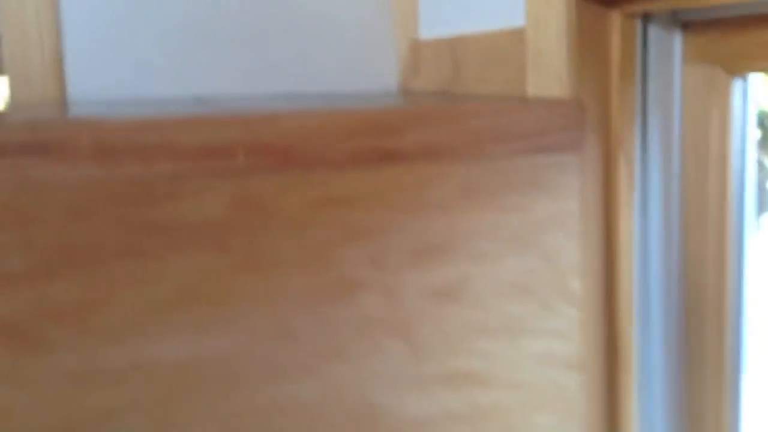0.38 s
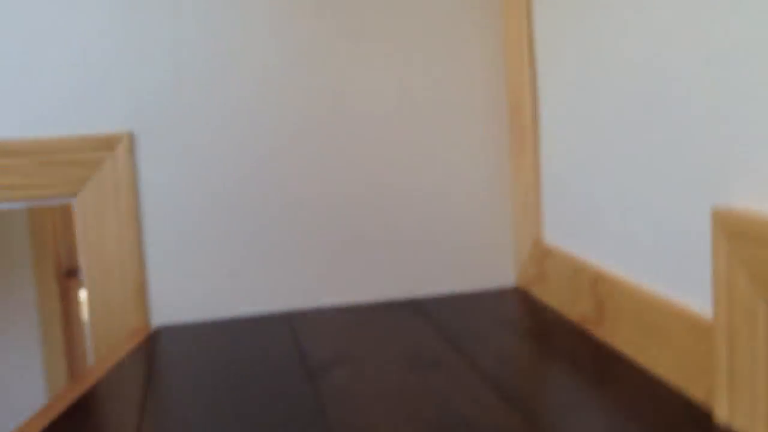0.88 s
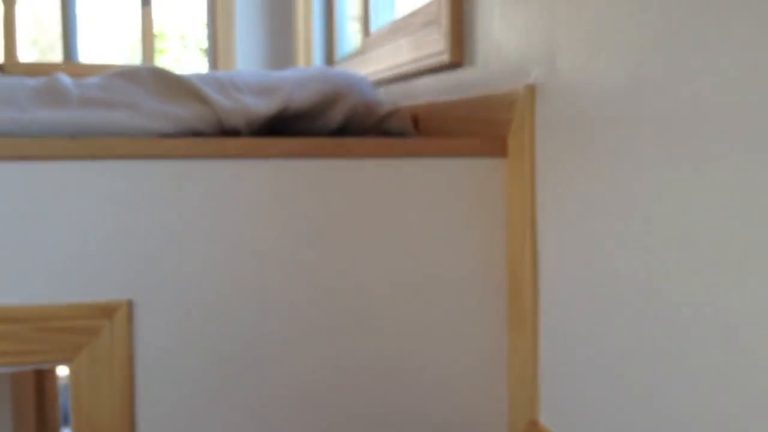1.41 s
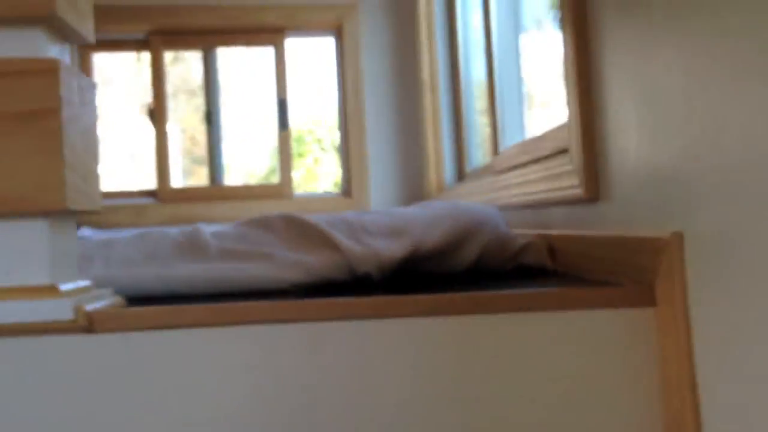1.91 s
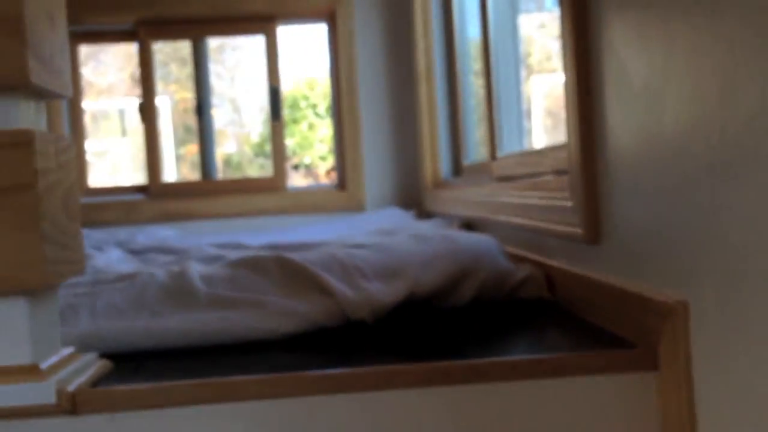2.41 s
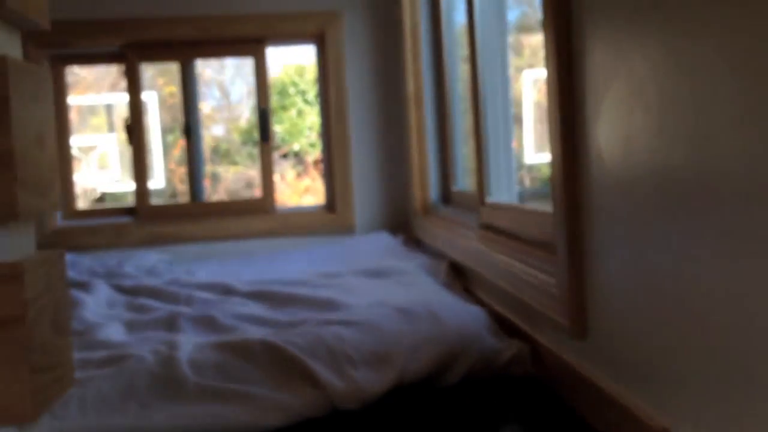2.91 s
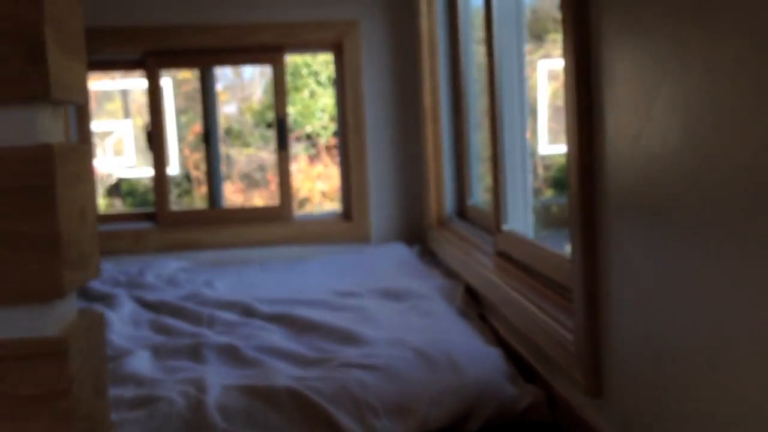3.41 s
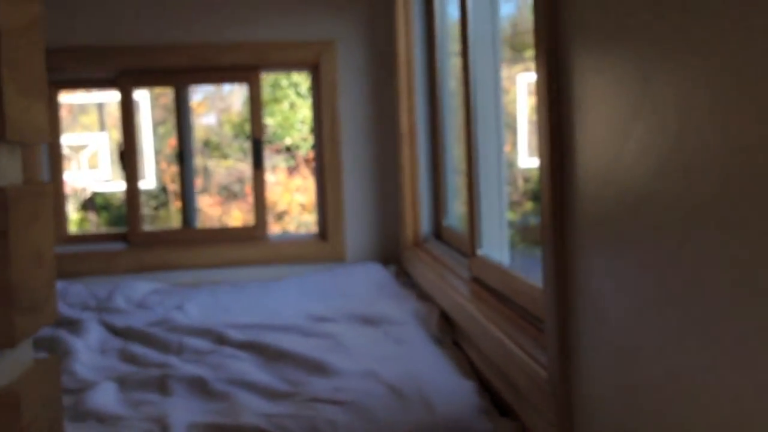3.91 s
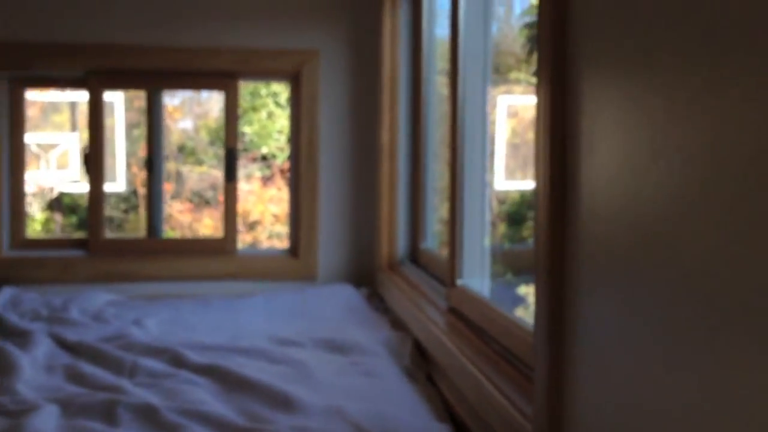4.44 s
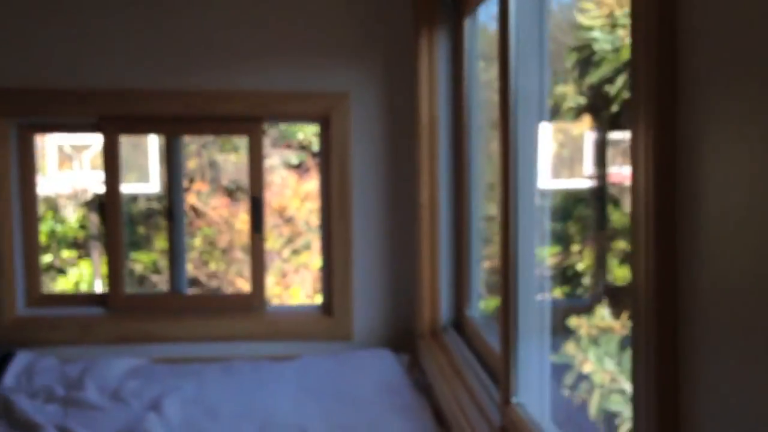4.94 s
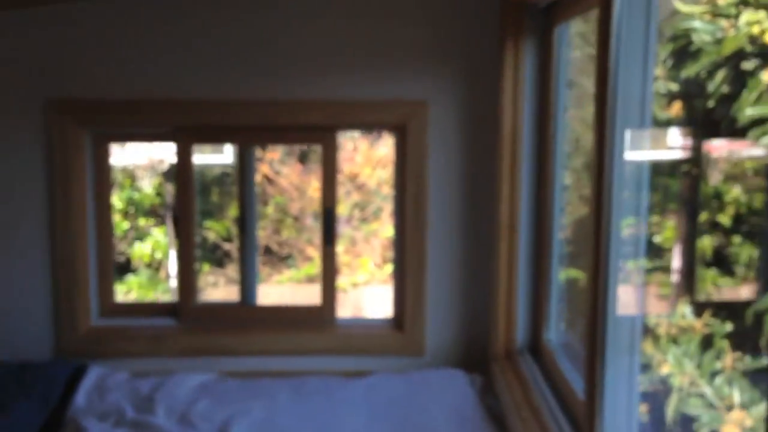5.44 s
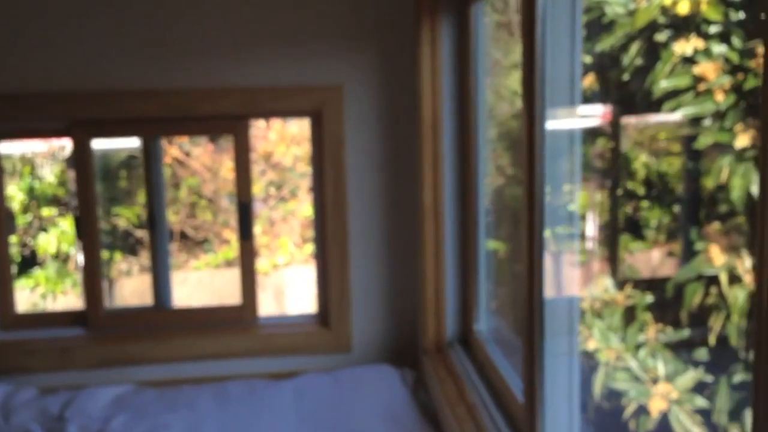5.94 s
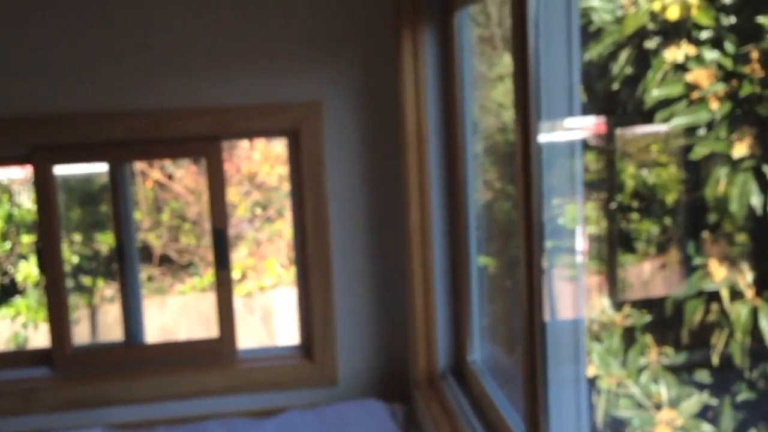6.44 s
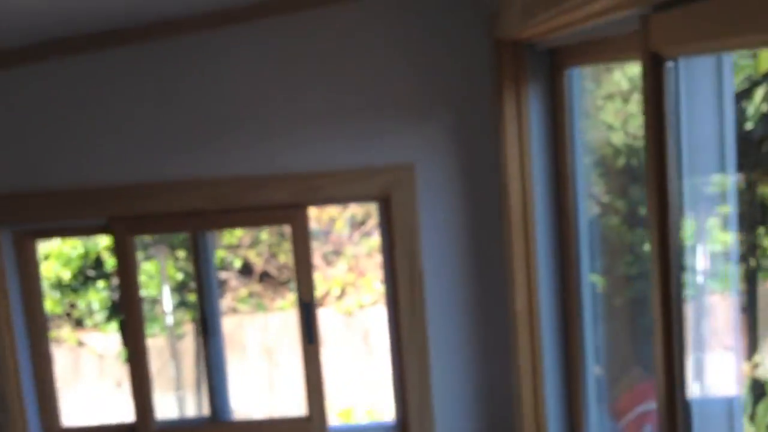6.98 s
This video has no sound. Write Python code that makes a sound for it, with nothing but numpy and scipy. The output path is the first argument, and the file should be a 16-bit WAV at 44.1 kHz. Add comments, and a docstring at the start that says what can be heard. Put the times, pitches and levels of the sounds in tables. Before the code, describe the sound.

Uneven heavy thuds and woody knocks as someone climbs solid wooden steps into a small loft, with cloth brushing over a soft low rumble.

```python
"""A soft house rumble under microphone hiss is heard first; then heels, knees and hands thud on solid wooden
steps as someone climbs into a small loft, close to the microphone. Harder contacts also crack into the room,
cloth brushes now and then, and faint tones hum. Thuds are damped board modes set off by contacts, cracks are
coloured noise bursts with high modes and a room tail, cloth is grainy noise, rumble is two bands of uneven
noise, hums are sines."""
import sys
import numpy as np
from scipy import signal
from scipy.fft import rfft, irfft, next_fast_len
from scipy.io import wavfile
from scipy.ndimage import map_coordinates

SR = 44100
rng = np.random.default_rng(int(sys.argv[2]) if len(sys.argv) > 2 else 0)


def invert_db(x):
    """Field ratio 10**(x/20) for x, a level in decibels (scalar or array-like)."""
    u = np.asarray(x, float) / 20
    return 10 ** u


def digitize_waveform(pressure):
    """Quantize a signal to 16-bit integers and store it at the path in sys.argv[1].

    Rows of a 2-D input are taken as channels; values are limited to [-1, 1].
    """
    field = np.atleast_2d(pressure).T
    bounded = np.clip(field, -1, 1)
    quanta = np.round(bounded * 32767).astype(np.int16)
    wavfile.write(sys.argv[1], SR, quanta)


N = 312669


def unit(x):
    """Normalization: scale a signal to rms 1."""
    return x / np.sqrt(np.mean(x ** 2) + 1e-20)


def along(points, hz):
    """Logarithmic pitch scale: read (f/Hz, value) points along a log frequency axis."""
    f, v = np.transpose(points)
    return np.interp(np.log(hz + 1), np.log(f + 1), v)


def wobble(rate):
    """Band-limited fluctuation: a smooth random curve with rate knots a second."""
    knots = rng.standard_normal(int(N * rate / SR) + 4)
    return map_coordinates(knots, [np.arange(N) * rate / SR])


def noise(spectrum):
    """Spectral shaping: white noise filtered to a spectrum of (f/Hz, level/dB), rms 1."""
    m = next_fast_len(N + 8192)
    gain = invert_db(along(spectrum, np.fft.rfftfreq(m, 1 / SR)))
    return unit(irfft(rfft(rng.standard_normal(m)) * gain, m)[:N])


def add(out, s, sound):
    """Superposition: mix a sound in at s seconds."""
    part = out[round(s * SR):][:len(sound)]
    part += sound[:len(part)]


# spectrum of the microphone hiss: f/Hz, level/dB
HISS = [(100, -23.5), (200, -5), (400, -6), (700, -9), (1500, -12.5), (4000, -16), (15300, -20),
        (15380, -68)]


def microphone_hiss():
    """Stationary noise: the microphone's own hiss has a fixed spectrum and a steady level."""
    hiss_db = -67.5
    return invert_db(hiss_db) * noise(HISS)


# how much the shifting weight stirs the frame: t/s, level/dB before each part's own offset
WEIGHT = [(0.0, -63.5), (0.29, -68), (0.45, -64), (0.81, -65.5), (1.26, -67.5), (1.52, -60.5),
          (2.09, -66.5), (3.65, -66.5), (4.05, -69), (4.32, -67.5), (4.56, -53.5), (4.76, -62.5),
          (5.37, -67), (5.57, -63), (5.81, -66.5), (6.24, -64.5), (6.83, -67), (7.09, -52)]
# spectra of the deep and the higher part of the rumble: f/Hz, level/dB
DEEP = [(20, -21), (45, -9), (65, -5), (100, -5.5), (140, -23), (200, -64)]
MURMUR = [(60, -76), (110, 6), (160, 7), (300, -5), (500, -15.5), (1000, -29), (2000, -64)]
# faint tones: start t/s, end t/s, f/Hz, rms level/dB about which it wavers
HUMS = [(0.792, 1.505, 318.4, -76.5), (2.3, 3.7, 583.4, -79.5), (3.901, 4.456, 952, -83),
        (4.7, 5.5, 584, -77)]


def house():
    """Forced vibration: shifting weight stirs the frame to a lumpy rumble; faint tones come and go above it."""
    deep_db, murmur_db = -2.5, -2  # the two parts relative to the stir level
    times, levels = np.transpose(WEIGHT)
    stir_db = np.interp(np.arange(N) / SR, times, levels)
    deep = unit(invert_db(3 * wobble(9)) * noise(DEEP))
    out = invert_db(stir_db + deep_db + 1.5 * wobble(2.1)) * deep
    murmur = unit(invert_db(3.04 * wobble(17)) * noise(MURMUR))
    out += invert_db(stir_db + murmur_db) * murmur
    for start, end, hz, db in HUMS:
        t = np.arange(round((end - start) * SR)) / SR
        level = invert_db(db + 0.62 * wobble(4.6)[:len(t)])
        fade = signal.windows.tukey(len(t), 0.3)
        add(out, start, level * fade * np.sqrt(2) * np.sin(2 * np.pi * hz * t))
    return out


# strokes of cloth: t/s of the peak, level/dB at the peak, rise t/s, fall t/s
BRUSH = [(.5, -68.5, 0.13, 0.6), (1.11, -68.5, 0.12, 0.11), (2.178, -65.5, 0.045, 0.14),
         (3.22, -66.5, 0.091, 0.18), (3.56, -69, 0.052, 0.11), (4.72, -65, 0.022, .13),
         (5.0, -73, 0.11, .1), (6.73, -70, 0.041, 0.12)]
# spectrum of the brushing: f/Hz, level/dB
CLOTH = [(300, -34), (600, -4.5), (1000, -0.5), (2000, -4.5), (3500, -6.5), (6000, -11.5), (10000, -22),
         (14000, -42)]


def cloth():
    """Friction noise: catching fibres give uneven grains of noise under each stroke."""
    t = np.arange(N) / SR
    stroke = np.zeros(N)
    for s, db, rise, fall in BRUSH:
        stroke += np.interp(t, [s - rise, s, s + fall], [0, invert_db(db), 0])
    grains = invert_db(2.8 * wobble(60))
    return stroke * unit(grains * noise(CLOTH))


# reverberation of the loft: f/Hz, t60 t/s
LOFT = [(100, 0.3), (500, 0.3), (2000, 0.33), (5000, 0.35), (12000, 0.024)]


def loft(x, wet_db):
    """Reverberation: convolve with a fresh noise tail in which each frequency decays at its own rate."""
    hz, t, z = signal.stft(rng.standard_normal(SR // 2), SR, nperseg=256)
    decay = invert_db(-60 * t / along(LOFT, hz)[:, None])
    tail = signal.istft(z * decay, SR, nperseg=256)[1]
    tail *= 1 - np.exp(-np.arange(len(tail)) / (0.0045 * SR))  # the walls answer one after another
    return invert_db(wet_db) * signal.fftconvolve(x, tail / np.linalg.norm(tail))


def bell_db(hz, centre_hz, octaves):
    """Contact spectrum: frequencies are excited less the farther they lie from the centre."""
    return -6 * (np.log2((hz + 1) / centre_hz) / max(octaves, 0.1)) ** 2


# modes of the boards: f/Hz, level/dB before excitation, t60 t/s before damping
BOARDS = [(61.3, -3, 0.33), (77, 7.5, 0.078), (88.4, -2, 0.3), (103, -10.5, 0.096), (118, 2.5, 0.3),
          (140, 6, 0.39), (175, -4, 0.56), (200.2, -4.5, 0.25), (250, -8, .15), (316, 0, .3),
          (355, -3, .18), (410, -2, .18), (465, -4, .2), (511, -2, .22), (592, -4, .35), (713, 11, 0.093),
          (820, -18, .15), (949, 6, 0.12), (1200, -13, 0.13), (1441, 9.5, 0.14), (1590, -14, 0.11),
          (1765, -8, 0.13), (2080, -6, 0.24), (2455, 2, 0.14), (2710, -14, 0.3), (3424, 3, 0.11),
          (3700, -7, 0.11), (4720, -7, 0.16)]


def ring(t, centre_hz, octaves, share, luck):
    """Modal superposition: one contact sets off the modes near a pitch as decaying sines; peak 1."""
    hz, level_db, t60 = np.transpose(BOARDS)
    strength_db = level_db + bell_db(hz, centre_hz, octaves) + luck
    near = strength_db > strength_db.max() - 40  # weaker modes are left out
    rate = 2j * np.pi * hz[near] - np.log(1000) / (t60[near] * max(share, 0.1))
    modes = invert_db(strength_db[near]) @ np.exp(np.outer(rate, t)).imag
    press = 1 - np.exp(-(centre_hz * t / 0.47) ** 2)  # the contact takes part of a cycle to press in
    sound = modes * press
    return sound / np.abs(sound).max()


def minimum_phase(gain):
    """Causality: fold the cepstrum of a gain curve forward in time, so nothing sounds before the contact."""
    cepstrum = irfft(np.log(gain + 1e-4))
    half = len(cepstrum) // 2
    cepstrum[1:half] *= 2
    cepstrum[half + 1:] = 0
    return np.exp(rfft(cepstrum))


# hard contacts: t/s, burst level/dB before length scaling, centre f/Hz, decay constant t/ms,
# room level/dB before a common offset
CRACKS = [(0.254, -45, 1530, 7.5, 7), (1.590, -50.5, 800, 4.5, 8), (1.796, -38, 1296, 3, -1),
          (1.845, -48, 900, 4, -4), (2.0, -58.5, 1030, 7.1, -2), (2.608, -44, 714, 5.2, 8),
          (4.482, -28.5, 1360, 3.05, -1), (5.444, -53, 700, 3.7, 8.5), (5.446, -55, 1420, 3.3, -1),
          (5.488, -56.5, 1490, 7.6, 0), (5.574, -39, 3900, 0.45, -11), (5.576, -47.5, 890, 1, -8),
          (5.604, -60.5, 2300, 11, -3), (5.695, -58.5, 900, 5.2, -3), (6.457, -50.5, 664, 2.9, -4),
          (6.845, -51, 1360, 3.5, -1), (7.003, -32, 800, 8.8, -9), (7.005, -33, 3460, 2.05, -4)]


def cracks():
    """Impact noise: a short burst takes the contact's colour and rings high modes; the room carries both on."""
    spread_octaves, spread_at_db, wider_per_db = 0.85, -44.5, 0.0344  # harder contacts excite a wider band
    out, t = np.zeros(N), np.arange(4096) / SR
    hz = np.fft.rfftfreq(len(t), 1 / SR)
    for s, db, centre_hz, ms, wet_db in CRACKS:
        octaves = spread_octaves + wider_per_db * (db - spread_at_db)
        colour = minimum_phase(invert_db(bell_db(hz, centre_hz, octaves)))
        decaying = rng.standard_normal(len(t)) * np.exp(-1000 * t / max(ms, 0.1))
        burst = irfft(rfft(decaying) * colour)
        size = invert_db(db) * np.sqrt(ms * SR / 4000)  # a longer burst holds more energy
        add(out, s, size * burst / np.linalg.norm(burst))

        scatter_db = 4 * rng.standard_normal(len(BOARDS))
        wood = ring(t, centre_hz, octaves, ms / 4, scatter_db)  # a longer contact rings longer
        add(out, s, invert_db(db - 6.0) * wood)

        click = irfft(colour)
        sent = click / np.linalg.norm(click) + 0.2 * wood / np.linalg.norm(wood)
        add(out, s, loft(size * sent, wet_db - 0.5))
    return out


# thuds on the boards: t/s, push level/dB, best excited low f/Hz, upper knock level/dB over the push,
# share of the undamped ring length
THUDS = [(0.252, -29, 118, -11.5, 0.97), (0.285, -39.5, 135, -11, 0.7), (0.303, -39, 147, -15, 0.34),
         (0.324, -44, 165, -12, .41), (0.4, -38, 121, -18, 0.47), (0.414, -33.5, 104.2, -21, 0.65),
         (0.447, -55, 128, -29, 0.83), (0.521, -42.5, 58.4, -17, .8), (0.535, -44.5, 108, -12, .87),
         (0.61, -46.5, 128, -29, 1), (1.031, -56, 58.3, -19, .53), (1.328, -40, 58.6, -34, .9),
         (1.364, -39, 66, -34, .31), (1.587, -42, 221, 1.5, 0.87), (1.605, -38, 79, 2.5, 0.52),
         (1.795, -35.5, 140, -5.5, 0.78), (1.839, -23.5, 147, -9, 0.61), (1.861, -31.5, 140, -3, 0.2),
         (2.27, -52.5, 63, -15, 0.62), (2.603, -38, 140, 10.5, .36), (2.610, -20, 175.5, .6, 0.43),
         (2.63, -32.5, 205, -3.5, 0.55), (2.902, -54.5, 62, -24, .76), (3.058, -53.5, 95, -16, .65),
         (3.559, -51.5, 64.5, -14, .62), (4.316, -53, 164, -7, 0.96), (4.427, -45.5, 66.5, -8, 0.23),
         (4.481, -23, 194, -4, 0.3), (4.519, -25.5, 186, -22, 0.35), (4.63, -46.5, 109, -7, 0.78),
         (4.933, -45, 79, -32, .52), (4.964, -39, 74, -42, .44), (5.445, -28, 181.8, -0.5, 0.68),
         (5.46, -37.5, 234, -3.5, .9), (5.574, -43, 176, -11, 0.11), (6.11, -49.5, 75, -31, .97),
         (6.456, -39, 154, 13, 0.42), (6.496, -43.5, 153, -14, 0.36), (6.998, -16, 209, -12.5, 0.13),
         (7.004, -22, 79, -13.5, .95), (7.076, -33, 119, -43, 0.79)]


def thuds():
    """Modal excitation: a push rings low modes, its harder edge knocks upper ones; the weight on top damps both."""
    knock_over_push, lowest_knock_hz = 2.44, 355  # pitch ratio of knock to push, and its lower limit
    out, t = np.zeros(N), np.arange(SR // 3) / SR
    scatter_db = 2.35 * rng.standard_normal((len(THUDS), len(BOARDS)))
    for (s, db, low_hz, knock_db, share), luck in zip(THUDS, scatter_db):
        upper_hz = max(knock_over_push * low_hz, lowest_knock_hz)
        push = ring(t, low_hz, 0.23, share, luck)
        knock = invert_db(knock_db) * ring(t, upper_hz, 0.35, share, luck)
        add(out, s, invert_db(db) * (push + knock))
    return out + loft(out, wet_db=-13.0)[:N]


def scene():
    """Superposition: all sources add at one microphone."""
    return (house() + cloth() + cracks() + thuds())[None]


def band_limit(x):
    """A steep low-pass at the top of the band."""
    return signal.sosfilt(signal.butter(12, 15700, fs=SR, output="sos"), x)


def record(dry):
    """High-pass response: the microphone drops the deepest bass and adds its steady hiss."""
    low_cut_hz = 38
    high_pass = signal.butter(2, low_cut_hz, "highpass", fs=SR, output="sos")
    mix = signal.sosfilt(high_pass, dry) + microphone_hiss()
    return band_limit(mix)


dry = scene()
out = record(dry)
digitize_waveform(out)
```